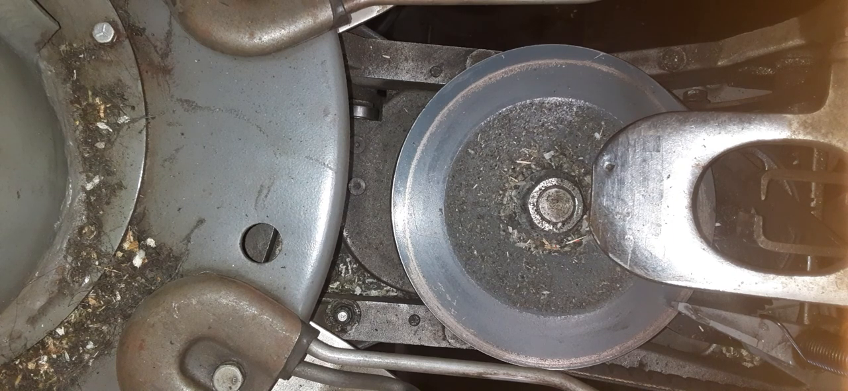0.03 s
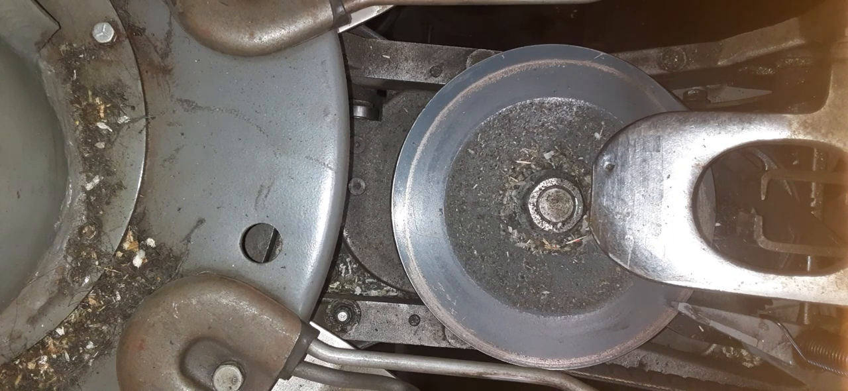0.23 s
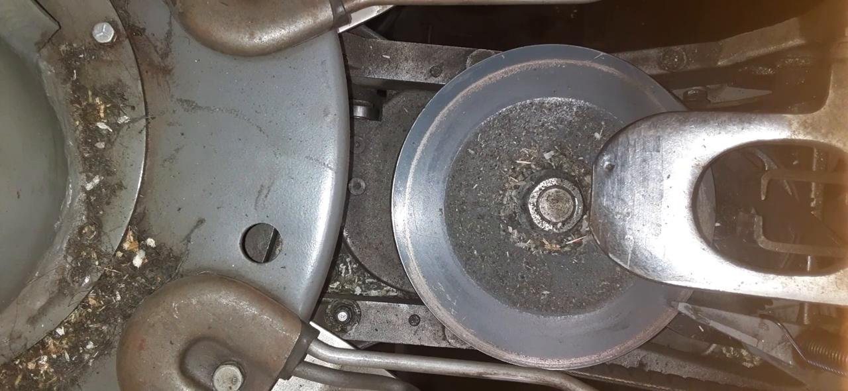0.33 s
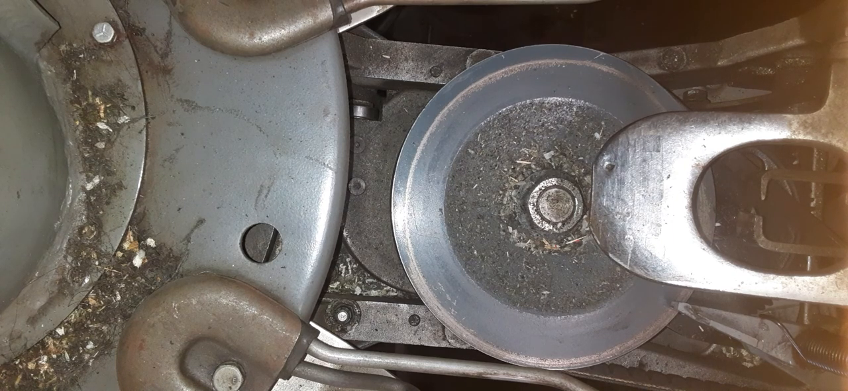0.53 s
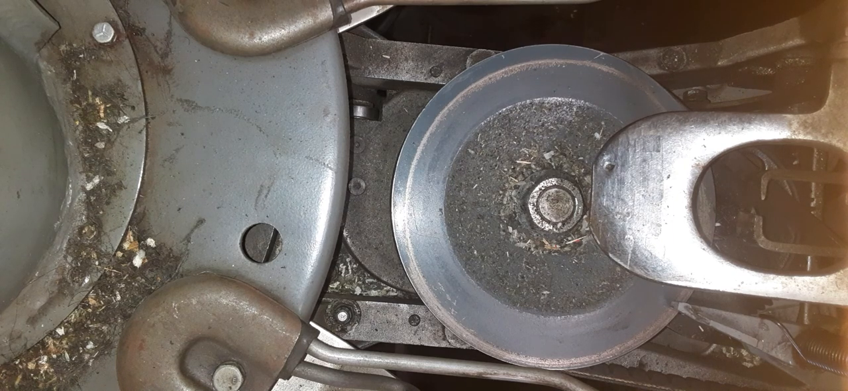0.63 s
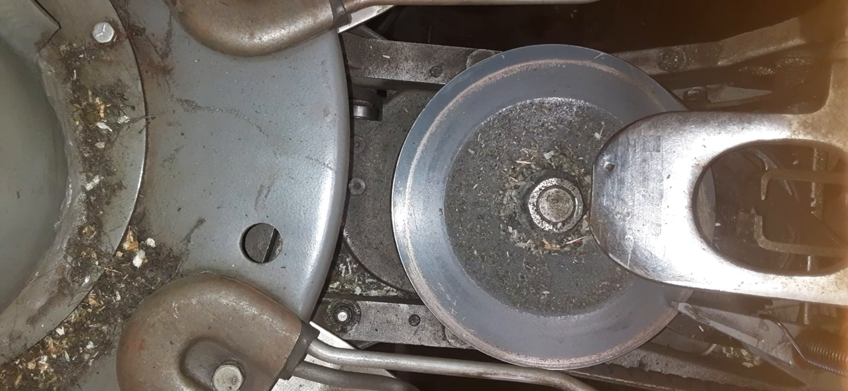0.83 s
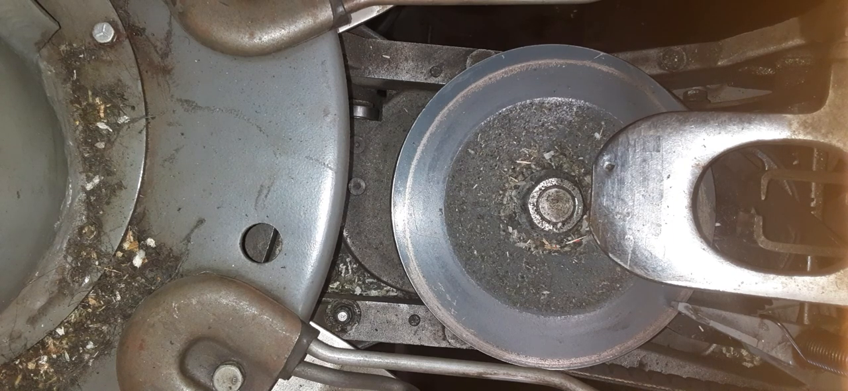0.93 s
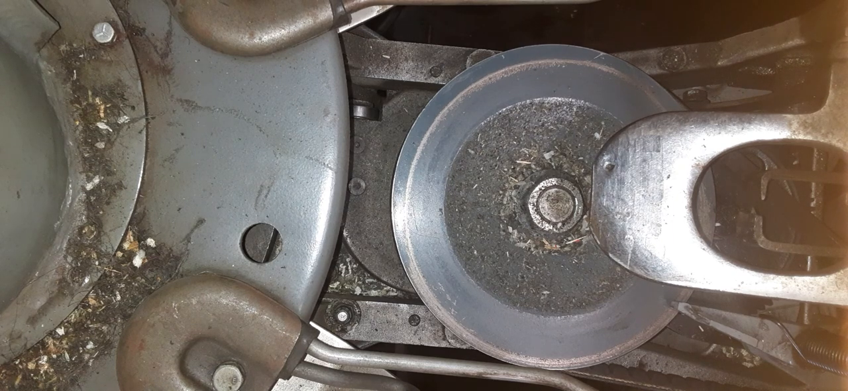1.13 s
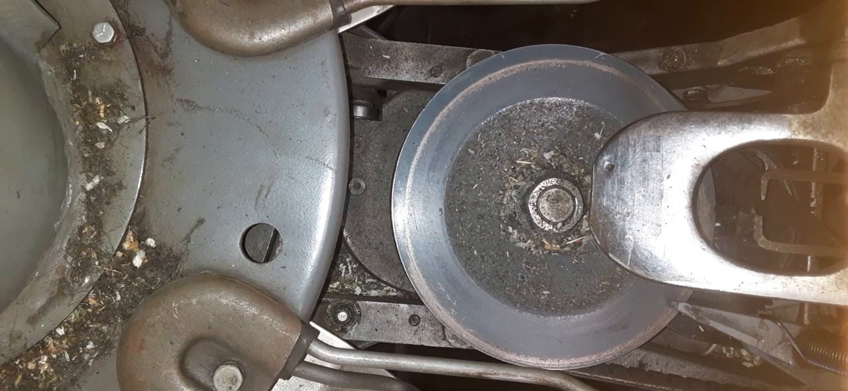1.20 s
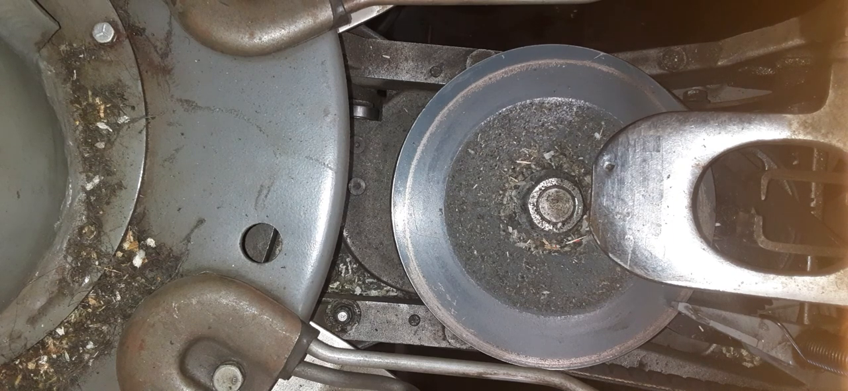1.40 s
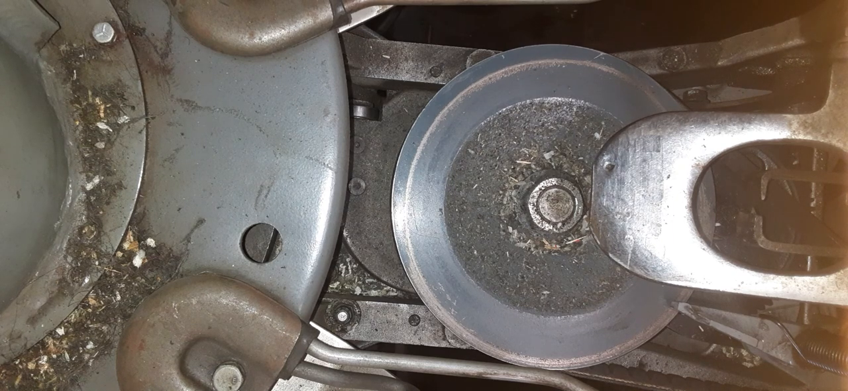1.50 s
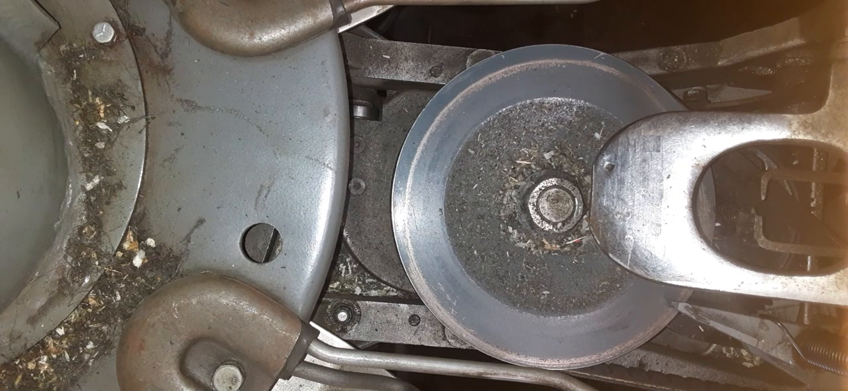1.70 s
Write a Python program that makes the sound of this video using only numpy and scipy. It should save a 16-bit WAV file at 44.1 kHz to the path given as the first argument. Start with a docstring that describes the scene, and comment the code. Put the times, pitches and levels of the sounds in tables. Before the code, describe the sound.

A worn clutch rasps harshly, close inside a bowling pinsetter, over constant motor hum and rumble. Linkages knock first, then gritty metallic strokes with brief high squeals come at about 0.2, 0.7 and 1.3 seconds. A sharp clank lands at 0.4 seconds, and ringing clatter peaks around 0.9. Light taps ping the disc before the third stroke and at 1.7 seconds, where a fourth barely begins.

```python
"""Close up inside a running bowling pinsetter. The motor hums and the drive rumbles throughout.
Linkages knock first, ringing the frame. Then a worn friction clutch drags in short strokes: its faces
stick and slip, shaking the steel housing, ringing the disc and squealing, while grit hisses between
them. The linkages clatter hardest around the second stroke. A light tap pings the disc just before
the third stroke and again before the fourth, which has barely begun when the sound ends."""
import sys
import numpy as np
from scipy import signal
from scipy.fft import rfft, irfft
from scipy.io import wavfile
from scipy.ndimage import uniform_filter1d

SR = 44100
rng = np.random.default_rng(int(sys.argv[2]) if len(sys.argv) > 2 else 0)


def wrap_up_sound(samples):
    """Save the sound to the file named by the first command line argument, as 16-bit audio."""
    columns = np.atleast_2d(samples).T
    # keep every value between -1 and 1, then stretch to whole-number steps
    tamed = np.clip(columns, -1, 1)
    steps = np.round(tamed * 32767).astype(np.int16)
    wavfile.write(sys.argv[1], SR, steps)


N = 77175
TIME = np.arange(N) / SR
FREQS = np.maximum(np.fft.rfftfreq(N, 1 / SR), 1)


def from_db(db):
    """Decibels to gain."""
    return 10 ** (np.asarray(db) / 20)


def rms_one(x):
    """Scale to unit power."""
    return x / np.sqrt(np.mean(x ** 2) + 1e-20)


def at_hz(points, hz):
    """Read a curve on a log-frequency axis."""
    point_hz, value = np.transpose(points)
    return np.interp(np.log(hz), np.log(point_hz), value)


def pan(db):
    """Constant-power gains for a left-minus-right level."""
    gains = from_db(np.outer([.5, -.5], db))
    return gains / np.sqrt(np.mean(gains ** 2, axis=0))


def drift(rate_hz):
    """Smooth random modulation of unit power."""
    return rms_one(irfft(rfft(rng.standard_normal(N)) / (1 + (FREQS / rate_hz) ** 2), N))


def lowpass(x, hz, order):
    """Butterworth low-pass."""
    return signal.sosfilt(signal.butter(order, min(hz, SR / 2 - 1), fs=SR, output="sos"), x + 1e-18)


def through(force, response):
    """Play a force through a stereo impulse response."""
    return signal.fftconvolve(force[None], response, axes=1)[:, :N]


def decay(t60_s, size=2 ** 14):
    """Exponential decay of unit energy."""
    return rms_one(np.exp(-np.log(1000) * TIME[:size] / t60_s)) / np.sqrt(size)


# Stereo width, narrow bass to wide treble: frequency_hz, shared_power_fraction
STEREO_LIKENESS = [(60, 0.4), (150, 1), (400, 0.86), (1200, 0.57), (4000, 0.23), (15000, 0.0974)]
LEFT_LAG_S = 0.0002846
def stereo_spectrum(hz):
    """White noise spectrum, partly shared by both sides and reaching the left later."""
    shared, *own = rng.standard_normal((3, len(hz))) + 1j * rng.standard_normal((3, len(hz)))
    alike = np.clip(at_hz(STEREO_LIKENESS, hz), 0, 1)
    both = np.sqrt(alike) * shared + np.sqrt(1 - alike) * np.array(own)
    both[0] *= np.exp(-2j * np.pi * hz * LEFT_LAG_S)
    return both


# Where each range sits in the image: frequency_hz, left_minus_right_db
BALANCE = [(80, -5), (350, -7), (600, -5), (850, 4.5), (1200, -2.5), (1800, -5), (2600, -2.5), (4400, 0),
           (7200, -5), (9000, -0.5), (15000, 0)]
def placement(hz):
    """Pan gains by frequency."""
    return pan(at_hz(BALANCE, hz))


def stereo_noise(eq):
    """Stereo noise of unit power, coloured by an EQ curve."""
    return rms_one(irfft(stereo_spectrum(FREQS) * placement(FREQS) * from_db(at_hz(eq, FREQS)), N))


# Tone of the drive's rumble and of its bass thrum: frequency_hz, gain_db
RUMBLE_EQ = [(25, -35), (80, -6.5), (180, -5), (250, -8.5), (320, -5.5), (550, -11.5), (850, -12),
             (1150, -16), (1550, -14), (2000, -19), (2800, -16), (4000, -27), (6500, -31), (9300, -46.5),
             (12000, -25.5), (15500, -27.5)]
THRUM_EQ = [(25, -58), (50, -14.5), (80, 10), (110, -14.5), (200, -1.5), (370, -13.5), (700, -31.5)]
# Fader ride on the thrum: time_s, level_db
THRUM_SWELLS = [(0, -51.5), (.08, -57), (.3, -54), (.43, -53.5), (.58, -62), (.72, -76.5), (.85, -52),
                (1.0, -53), (1.2, -82.5), (1.4, -59), (1.6, -58), (1.75, -68)]
# Motor and belt tones: pitch_hz, level_db
HUM_TONES = [(80, -72), (100, -73), (120, -67.5), (240, -64), (365, -67.5), (1548, -82.5)]
RUMBLE_DB, HUM_WAVER_DB, HUM_WANDER_HZ = -59, -0.5, 4.3
def drive():
    """The running drive lays a bed of steady rumble, swelling bass thrum and wavering motor hum."""
    rumble = from_db(RUMBLE_DB) * stereo_noise(RUMBLE_EQ)
    thrum = from_db(np.interp(TIME, *np.transpose(THRUM_SWELLS))) * stereo_noise(THRUM_EQ)
    hum = 0
    for hz, db in HUM_TONES:
        phase = 2 * np.pi * np.cumsum(hz + HUM_WANDER_HZ * drift(rate_hz=12.4)) / SR
        level = from_db(db + HUM_WAVER_DB * drift(rate_hz=9.9))
        hum += placement(hz) * level * np.sqrt(2) * np.sin(phase)
    return rumble + thrum + hum


# Reverb time inside the machine's enclosure: frequency_hz, t60_s
ENCLOSURE_DECAY = [(200, 0.48), (1000, 0.4), (3000, 0.31), (7000, 0.24), (11000, 0.22), (16000, 0.22)]
EVEN_OVER_HZ = 380
def steel_body(eq, ring_t60_s, tail_db, low_hz=1, high_hz=SR):
    """Dense steel resonances within a band: a quick ring, then the enclosure's tail."""
    size = 2 ** 15
    hz = np.maximum(np.fft.rfftfreq(size, 1 / SR), 1)
    noise, ring = stereo_spectrum(hz), 0
    octaves = np.floor(np.log2(np.maximum(hz, 300) / 140))
    for octave in np.unique(octaves):
        band = octaves == octave
        tail = from_db(tail_db) * decay(at_hz(ENCLOSURE_DECAY, hz[band].mean()), size)
        ring += irfft(noise * band) * np.hypot(decay(ring_t60_s, size), tail)
    # Flatten broad bumps so that the EQ sets the tone.
    spectrum = rfft(ring)
    spectrum /= np.sqrt(uniform_filter1d(abs(spectrum) ** 2, int(EVEN_OVER_HZ / SR * size)))
    band_cut = np.sqrt((1 + (low_hz / hz) ** 40) * (1 + (hz / high_hz) ** 40))
    gain = placement(hz) * from_db(at_hz(eq, hz)) / band_cut
    # Minimum phase keeps the attack sharp.
    log_gain = np.log(np.hstack([gain, gain[:, -2:0:-1]]))
    minimum_phase = np.exp(np.conj(signal.hilbert(log_gain))[:, :len(hz)])
    return rms_one(irfft(spectrum * minimum_phase)[:, :size // 2]) / np.sqrt(size // 2)


def modes(partials, pan_db):
    """Ringing partials, each with its own phase left and right."""
    phases, ring = rng.uniform(0, 2 * np.pi, (len(partials), 2, 1)), 0
    for (hz, db, t60_s), phase in zip(partials, phases):
        envelope = from_db(db) * np.sqrt(2) * decay(t60_s)
        ring += envelope * np.sin(2 * np.pi * hz * TIME[:len(envelope)] + phase)
    return pan(pan_db) * ring


def jolts(per_s, size=N, spread_db=4.5):
    """Tiny irregular impulses of metal slipping or rattling, at unit power."""
    strengths = from_db(spread_db * np.minimum(rng.exponential(1, size), 3))
    signs = rng.choice([-1, 1], size)
    return rms_one(strengths * signs * (rng.random(size) < per_s / SR))


# Tone of the struck frame: frequency_hz, gain_db
FRAME_EQ = [(60, -36), (150, -13.5), (260, -10.5), (370, -2), (480, -2.5), (640, 3.5), (900, -2),
            (1350, 1.5), (2500, 2.5), (3400, -1), (4300, 1), (6500, 1.5), (9000, 4.5), (15000, -14.5)]
# The frame's ring: pitch_hz, gain_db, t60_s
FRAME_PARTIALS = [(364.7, -1.5, .22), (412, -11, 0.22), (625, -6, 0.28), (883, -3, 0.22), (1173, -4.5, .18),
                  (1548, 1, 0.15), (2512, 0.5, 0.27), (2945, -7, 0.3)]
# Linkage hits: start_s, strength_db, lowpass_hz, bass_lift_db
LINKAGE_KNOCKS = [(.001, -45.5, 4670, 15), (.031, -36, 3450, 0), (0.056, -32, 3770, 5.5),
                  (0.159, -40.5, 4240, 8), (0.178, -44.5, 3440, 14), (.409, -22, 5280, 0),
                  (0.446, -44, 5000, 11.5), (.518, -37.5, 2930, -5), (.679, -44, 3950, 1.5),
                  (.705, -36, 1480, -8), (0.78, -25.5, 5120, -7), (.853, -32, 1100, 12),
                  (.892, -23.5, 3500, 4), (.906, -19, 6270, 6), (.920, -35, 4120, 1), (0.934, -29, 190, 15),
                  (.949, -30, 7300, 11), (.982, -31, 4770, -6), (1.563, -36, 4650, 6.5),
                  (1.7, -38, 4200, 8.5)]
HIT_GAIN = np.sqrt(0.0096 * SR)   # an impulse with the energy of 9.6 ms at unit power
HARD_SHARE, BASS_SHELF_HZ = .55, 680
CRACK_DB, FRAME_RING_DB, FRAME_PAN_DB = -1, -16.5, -3
def linkage():
    """Each knock is one hard contact that cracks and rings the frame, then a rattle of loose ones."""
    force, fade = np.zeros(N + SR), decay(t60_s=0.028)
    for start_s, db, lowpass_hz, bass_db in LINKAGE_KNOCKS:
        rattle = rms_one(jolts(per_s=2500, size=len(fade)) * fade)
        contacts = rattle * np.sqrt((1 - HARD_SHARE) / len(fade))
        contacts[0] += np.sqrt(HARD_SHARE)
        blow = lowpass(contacts * HIT_GAIN, lowpass_hz, order=3)
        blow += (from_db(bass_db) - 1) * lowpass(blow, BASS_SHELF_HZ, order=1)
        start = int(start_s * SR)
        force[start:start + len(blow)] += from_db(db) * blow
    crack = from_db(CRACK_DB) * steel_body(FRAME_EQ, ring_t60_s=.022, tail_db=-np.inf, low_hz=550)
    clank = steel_body(FRAME_EQ, ring_t60_s=0.2, tail_db=-2.5)
    ring = from_db(FRAME_RING_DB) * modes(FRAME_PARTIALS, FRAME_PAN_DB)
    return through(force[:N], crack + clank + ring)


# Tone of the rubbed housing: frequency_hz, gain_db
HOUSING_EQ = [(120, -18.5), (280, -50.5), (365, -3.5), (470, -15.5), (620, -1.5), (850, 4.5), (1080, -1.5),
              (1350, -1.5), (1530, 0.5), (1850, -0.5), (2600, 3.5), (3100, -1.5), (3350, -6), (3800, 4),
              (4500, 0), (5700, -3), (6500, -0.5), (8000, -5), (8800, -12.5), (10200, -13.5), (12000, -8.5),
              (13200, -12.5), (15000, -11), (16000, -17.5)]
# The clutch disc's ring: pitch_hz, gain_db, t60_s
DISC_PARTIALS = [(3028, -7, .15), (3081, -7, .15), (3860, -5, .15), (4118, -5, .13), (4324, -5, .1),
                 (4464, 1, .12), (4511, 0, .16), (4650, -3, .16), (5321, -9, .12), (6024, -9, .13),
                 (6343, -6, .15), (6662, -4, .18), (7437, -9, .12), (7710, -4, .15), (7766, -3, .18),
                 (8033, -6, .15), (8556, -11, .15)]
# Envelope points, one list per stroke: time_s, rasp_gain_db, grind_gain_db, grit_gain_db
CLUTCH_STROKES = [
    [(.229, -21.5, -32, -28.5), (.243, -15.5, -22, -25), (.258, -12, -28, -22.5), (.28, -18, -27.5, -21),
     (.325, -23, -33, -30), (.36, -25.5, -38, -33), (.385, -56, -34, -56)],
    [(.727, -26, -28, -29.5), (.755, -29, -34, -32.5), (.783, -28.5, -43, -31), (.8, -33, -36, -35),
     (.818, -26, -30, -28), (.87, -24.5, -31.5, -29), (.9, -40, -31, -34), (.955, -28.5, -70, -33.5),
     (.99, -68, -40, -95)],
    [(1.338, -24, -26.5, -30.5), (1.358, -26, -37.5, -35), (1.37, -29.5, -31.5, -35),
     (1.41, -22.5, -32, -32), (1.447, -21.5, -29, -30), (1.495, -33, -47, -37.5), (1.515, -50, -54, -51),
     (1.57, -51, -77, -56)],
    [(1.742, -33.5, -30, -41), (1.76, -45, -47, -35)],
]
HOUSING_DECAY = dict(ring_t60_s=0.06, tail_db=1)
GRIND_BELOW_HZ, GRIT_ABOVE_HZ = 3230, 9400   # the rasp lies between
GRIND_DB, RASP_DB, GRIT_DB = -2.5, -7, -5
FRAME_SHAKE_DB, DISC_DB, DISC_PAN_DB = -16.5, -15, -3.5
BITE_DB, BITE_S, CHATTER_DB = 5, .003, 2
def clutch(patches=3):
    """Stick-slip at a few contact patches drives the housing in three bands and rings frame and disc."""
    envelopes, bite = np.zeros((3, N)), np.zeros(N)
    for stroke in CLUTCH_STROKES:
        times, *levels = np.transpose(stroke)
        envelopes += from_db([np.interp(TIME, times, db, left=-200, right=-200) for db in levels])
        # The faces crack as they first meet.
        bite[int(times[0] * SR) + 1] = from_db(BITE_DB) * np.sqrt(BITE_S * SR / patches)
    rasp, grind, grit = envelopes
    grip, out = rms_one(from_db(CHATTER_DB * drift(rate_hz=96))), 0
    for _ in range(patches):
        friction = jolts(per_s=900) * grip / np.sqrt(patches)
        lows = steel_body(HOUSING_EQ, **HOUSING_DECAY, high_hz=GRIND_BELOW_HZ)
        mids = steel_body(HOUSING_EQ, **HOUSING_DECAY, low_hz=GRIND_BELOW_HZ, high_hz=GRIT_ABOVE_HZ)
        highs = steel_body(HOUSING_EQ, ring_t60_s=0.054, tail_db=-11.5, low_hz=GRIT_ABOVE_HZ)
        frame = from_db(FRAME_SHAKE_DB) * modes(FRAME_PARTIALS, FRAME_PAN_DB)
        disc = from_db(DISC_DB) * modes(DISC_PARTIALS, DISC_PAN_DB)
        out += through(friction * grind, from_db(GRIND_DB) * lows + frame)
        out += through((friction + bite / 2) * rasp, from_db(RASP_DB) * mids + disc)
        out += through((friction + bite) * grit, from_db(GRIT_DB) * highs)
    return out


# Squeals of the biting faces: start_s, length_s, pitch_hz, level_db
CLUTCH_SQUEALS = [(.250, 0.019, 4280, -25), (.815, .028, 4340, -31), (.945, 0.0078, 4430, -27.5),
                  (.974, .018, 4430, -35), (1.342, .015, 4390, -28), (1.362, 0.042, 4440, -29.5),
                  (1.392, 0.014, 4600, -39), (1.436, 0.024, 4460, -47), (1.473, 0.014, 4470, -31.5),
                  (1.475, 0.071, 4690, -41)]
def squeal(wander_hz=125, flutter_hz=340, rough_db=3, rise_hz_per_s=2200):
    """Short rough tones that waver and climb where the slipping locks to the disc."""
    wander = wander_hz * drift(flutter_hz)
    roughness = rms_one(from_db(rough_db * drift(flutter_hz)))
    lag_s, out = np.array([[LEFT_LAG_S], [0]]), 0
    for start_s, length_s, hz, db in CLUTCH_SQUEALS:
        age_s = TIME - start_s
        swell = np.sqrt(abs(np.sin(np.pi * np.clip(age_s / length_s, 0, 1))))
        pitch_hz = hz + rise_hz_per_s * age_s + wander
        phase = 2 * np.pi * (np.cumsum(pitch_hz) / SR - hz * lag_s)
        out += from_db(db) * swell * roughness * np.sqrt(2) * np.sin(phase)
    return pan(DISC_PAN_DB) * out


# Light taps on the disc: start_s, strength_db
TAPS = [(1.322, -57.5), (1.703, -50.5)]
def disc_pings(tick_db=7):
    """A light touch just before a stroke ticks in the housing and leaves the disc ringing."""
    force = np.zeros(N)
    for start_s, db in TAPS:
        force[int(start_s * SR)] = from_db(db) * HIT_GAIN
    tick = from_db(tick_db) * steel_body(HOUSING_EQ, **HOUSING_DECAY)
    ring = modes(DISC_PARTIALS, DISC_PAN_DB)
    return through(lowpass(force, hz=7000, order=4), tick + ring)


def scene():
    """The clutch with its squeals and pings, and the linkage, over the bed of the drive."""
    return clutch() + squeal() + disc_pings() + linkage() + drive()


CUTOFF_HZ = 15900
def record(dry):
    """A steep low-pass takes the very top off the mix."""
    return signal.sosfilt(signal.ellip(12, .1, 80, CUTOFF_HZ, fs=SR, output="sos"), dry)


dry = scene()
out = record(dry)
wrap_up_sound(out)
```